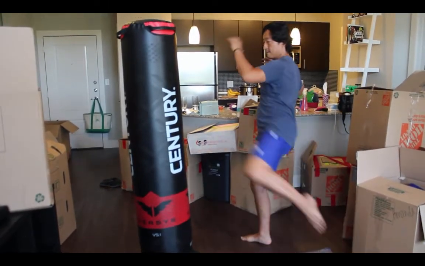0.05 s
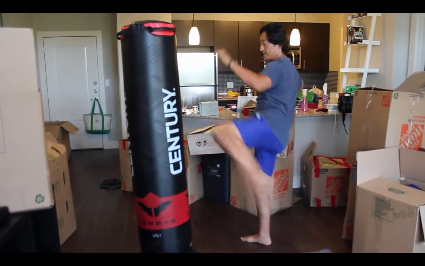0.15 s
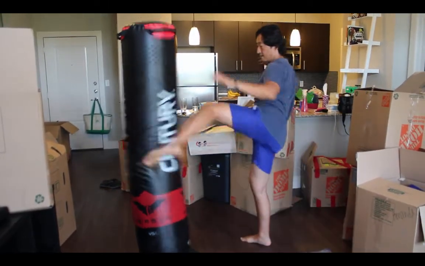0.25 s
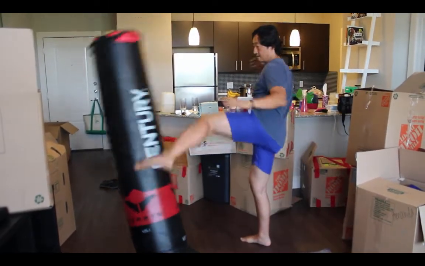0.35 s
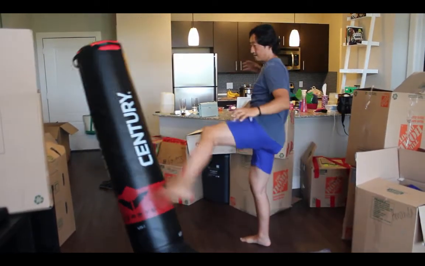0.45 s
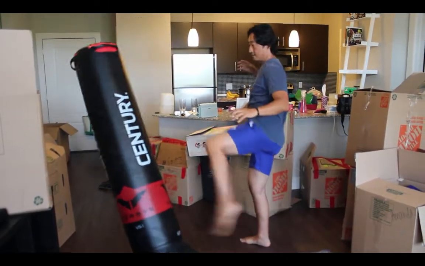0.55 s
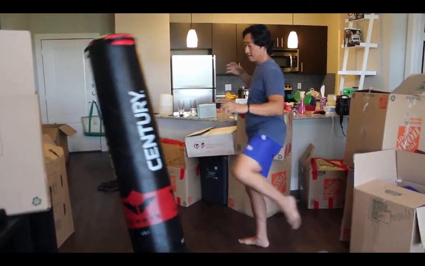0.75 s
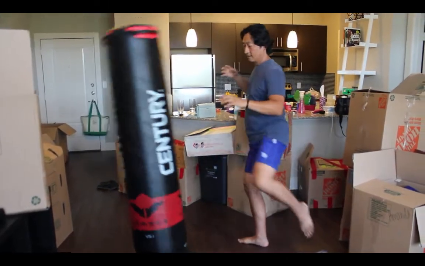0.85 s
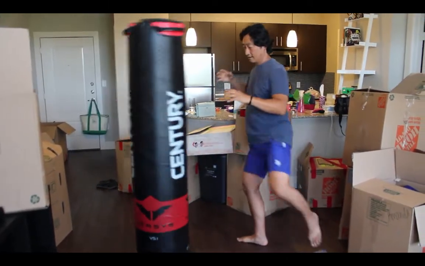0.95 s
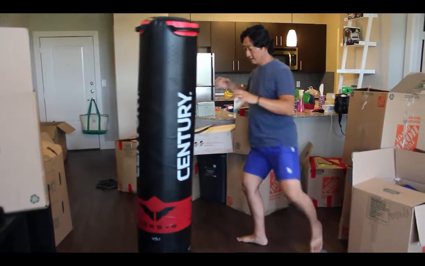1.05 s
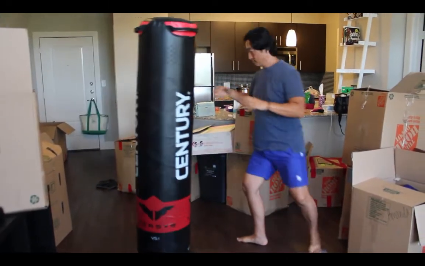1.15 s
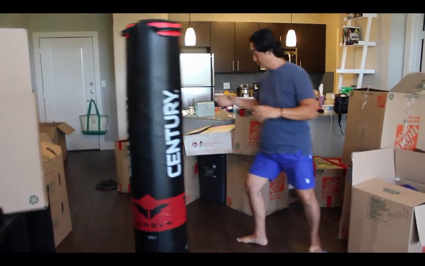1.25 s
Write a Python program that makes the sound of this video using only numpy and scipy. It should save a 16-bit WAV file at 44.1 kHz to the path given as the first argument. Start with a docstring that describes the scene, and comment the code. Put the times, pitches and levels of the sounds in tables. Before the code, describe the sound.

A bare foot smacks a heavy free-standing punching bag once, loud and sharp, in a living room

```python
"""Over steady room noise a standing foot twists on the floor and a rustle swells, then a bare foot smacks
a free-standing punching bag in a living room. The slap is a damped pressure pulse with the ringing modes
and bright crack of the vinyl cover; delayed copies, decaying noise and low modes make the room's answer.
Decaying sines make the base thuds and floor touches; shaped noise makes the scuffs, rustles and twist.
A limiter holds down the slap and the start of its tail, then lets the level recover."""
import sys
import numpy as np
from scipy import signal
from scipy.io import wavfile

SR = 44100
rng = np.random.default_rng(int(sys.argv[2]) if len(sys.argv) > 2 else 0)


def int16_out(signal):
    """Quantize to a 16-bit WAV file."""
    q = np.round(np.clip(np.atleast_2d(signal).T, -1, 1) * 32767)
    wavfile.write(sys.argv[1], SR, q.astype(np.int16))


N = 57330
T = np.arange(N) / SR   # time axis in seconds

# In every spectrum the levels are relative: the noise is scaled to rms 1 before its envelope.
# Modes of the struck cover: pitch_hz, level_db, t60_s
COVER_MODES = [(177, -13, 0.017), (347.6, 1.5, 0.059), (469, -11.5, 0.018), (940, -7, 0.017),
               (1540, 0, 0.014), (2133, 4.5, 0.012), (3020, -24, 0.027)]
# Echoes from floor, ceiling and boxes: delay_s, level_db
ECHOES = [(.00245, -4.5), (.0045, -5.5), (.0072, -14), (.0093, -17.5), (0.0094, -15.5), (0.0138, -16)]
# Spectrum of the scatter from the furniture: frequency_hz, relative_db_per_hz
SCATTER_SPECTRUM = [(60, -24), (110, -36), (170, 15), (350, -21), (700, 3.5), (950, 8), (1200, 1),
                    (1600, -2.5), (3200, -2), (4000, -36), (6000, -12.5), (15500, -12)]
# Spectrum of the room's tail: frequency_hz, relative_db_per_hz
TAIL_SPECTRUM = [(59, -48), (100, -10), (140, -6.5), (209, -8.5), (238, -11), (370, -1), (457, -19),
                 (564, 13), (627, -7), (1160, -7.5), (1260, -12.5), (1590, -6), (2470, -15), (5170, -17.5),
                 (15500, -26.5)]
# Decay time of the room's tail: frequency_hz, t60_s
ROOM_T60 = [(120, 0.6), (350, 0.61), (800, 0.66), (1500, .68), (5000, 0.71), (9000, .53), (15000, 0.57)]
# Low modes of the room: pitch_hz, level_db, t60_s
ROOM_MODES = [(148.7, -13.5, 0.32), (216.3, -16.5, 0.27), (342.6, -27.5, 0.78), (365, -17, 0.36),
              (498.3, -18.5, 0.39), (571.7, -23, 0.64), (626, -31, 0.52), (682.6, -30, 0.36),
              (742, -25.5, 0.58), (871, -35, .62), (1015, -24, 0.42)]
# Thuds of the base: start_s, level_db
THUDS = [(0.252, -23), (0.297, -21.5), (0.317, -30), (.417, -36), (0.493, -38), (0.541, -38.5)]
# Spectrum of the scuffing base: frequency_hz, relative_db_per_hz
SCUFF_SPECTRUM = [(88, -30), (150, -5), (230, -35), (258, -1.5), (381, -8.5), (471, 10), (509, -10),
                  (751, -6), (894, -6.5), (1510, -3), (15500, -30)]
# Course of the scuffing, its end values held outward: time_s, level_db
SCUFF_LEVEL = [(.6, -54.5), (.79, -50), (.85, -44.5), (.93, -42), (1.0, -44.5), (1.1, -44.5), (1.19, -51),
               (1.26, -47.5), (1.3, -48)]
# Spectrum of the standing foot's twist: frequency_hz, relative_db_per_hz
PIVOT_SPECTRUM = [(200, -6), (600, -17), (1100, -0.5), (1650, 0), (2300, -10), (3100, -9.5), (5000, -19),
                  (15000, -58)]
# Rustles of the shorts and the vinyl, with exponential time constants: peak_s, level_db, rise_s, fall_s
RUSTLES = [(0.25, -39, 0.094, .02), (.415, -32.5, 0.02, 0.022), (.89, -50.5, 0.1, 0.11),
           (1.09, -57, 0.011, 0.046)]
# Spectrum of the rustles: frequency_hz, relative_db_per_hz
RUSTLE_SPECTRUM = [(200, 10), (1500, -12), (3000, 0.5), (6000, -4.5), (11000, -1.5), (15500, -0.5)]
# Soft touches of feet and base on the floor: start_s, level_db, pitch_hz
STEPS = [(0.736, -39, 330), (0.926, -47, 316), (1.051, -39, 291), (1.133, -40.5, 139), (1.268, -39, 323),
         (1.275, -39, 170), (1.283, -32, 335)]
# Spectrum of the steady room noise: frequency_hz, relative_db_per_hz
AIR_SPECTRUM = [(15, -39), (25, 3), (110, -13.5), (253, -3.5), (289, -11), (389, -1), (433, -21.5),
                (598, -9), (871, -20), (997, -16), (1620, -16.5), (2170, -28), (3340, -19.5),
                (15500, -33.5)]

KICK_S = 0.2491
# Air squeezed out between foot and cover
PUSH_DB, PUSH_HZ, PUSH_T60_S = 7.5, 350, 0.0054
# The instep lands flat on the vinyl: a bright ring and a burst of hiss
CRACK_LAG_S, CRACK_HZ, CRACK_DB = 0.00049, 5260, 22
CRACK_T60_S, CRACK_RISE_S = 0.002, 0.00044
SNAP_DB, SNAP_T60_S, SNAP_LOW_HZ = 12, 0.002, 8640
ECHO_LOW_HZ = 109   # small surfaces return little bass
SCATTER_DB, SCATTER_T60_S, SCATTER_RISE_S = -0.5, 0.1, 0.0036
TAIL_DB, TAIL_RISE_S = -10, 0.002
NULL_HZ, NULL_Q = 111.8, 1.34   # the room cancels this pitch at the microphone
THUD_HZ, THUD_T60_S, THUD_RISE_S = 50, 0.14, 0.0019
# The standing foot twists on the floor; its sole first breaks loose
PIVOT_S, PIVOT_DB, PIVOT_T60_S, PIVOT_RISE_S = 0.186, -38, 0.36, 0.0018
UNSTICK_DB, UNSTICK_T60_S, UNSTICK_RISE_S = -32, 0.018, 0.002
STEP_T60_S, STEP_RISE_S = 0.09, 0.0023
AIR_DB = -47
MIC_LOW_HZ, CUTOFF_HZ = 45, 15700   # bass roll-off of the microphone, upper band limit
LIMIT_DB, LIMIT_ATTACK_S, RELEASE_DB_PER_S, DETECT_S = -2.5, 0.00045, 53, 0.00062


def from_db(db):
    """Amplitude ratio is ten to the power of the level over twenty."""
    return 10 ** (np.asarray(db) / 20)


def at_hz(points, hz):
    """Pitch is logarithmic, so a table is interpolated on a log-frequency axis."""
    table_hz, values = np.transpose(points)
    return np.interp(np.log(hz), np.log(table_hz), values)


def fade(start, t60, rise=1e-5):
    """Exponential build-up and decay: rise is a time constant, t60 the time of a 60 dB fall."""
    age = np.maximum(T - start, 0)
    return (1 - np.exp(-age / rise)) * np.exp(-np.log(1000) * age / t60)


def ring(start, hz, t60, rise=1e-5):
    """Modal vibration: a struck mode is a sine that dies away exponentially."""
    return fade(start, t60, rise) * np.sin(2 * np.pi * hz * (T - start))


def highpass(sound, order, hz):
    """Butterworth filtering: a maximally flat response above the corner frequency."""
    return signal.sosfilt(signal.butter(order, hz, "high", fs=SR, output="sos"), sound)


def noise(spectrum, envelope=lambda hz: 1):
    """Band synthesis: third-octave noises add in power to rms 1 before each gets its envelope."""
    edges = 22 * 2 ** (np.arange(30) / 3)
    white = rng.standard_normal((2, N + SR // 4))   # the extra quarter second lets the filters settle
    total, power = 0, 0
    for k, (low, high) in enumerate(zip(edges, edges[1:])):
        center_hz = np.sqrt(low * high)
        bandpass = signal.butter(2, [low, high], "band", fs=SR, output="sos")
        band = signal.sosfilt(bandpass, white[k % 2])[-N:]   # neighbours use different noise
        gain = from_db(at_hz(spectrum, center_hz)) * np.sqrt(high - low)
        total = total + gain * band / band.std() * envelope(center_hz)
        power = power + gain ** 2
    return total / np.sqrt(power)


def slap():
    """Impact radiation: expelled air gives a steep pulse, the cover rings in its modes, then cracks."""
    pulse = np.cos(2 * np.pi * PUSH_HZ * (T - KICK_S))   # a cosine starts at full pressure
    push = from_db(PUSH_DB) * fade(KICK_S, PUSH_T60_S) * pulse
    cover = sum(from_db(db) * ring(KICK_S, hz, t60) for hz, db, t60 in COVER_MODES)
    crack_s = KICK_S + CRACK_LAG_S
    crack = from_db(CRACK_DB) * ring(crack_s, CRACK_HZ, CRACK_T60_S, CRACK_RISE_S)
    hiss = highpass(rng.standard_normal(N), 4, SNAP_LOW_HZ)
    snap = from_db(SNAP_DB) * hiss * fade(crack_s, SNAP_T60_S)
    return push + cover + crack + snap


def room(hit):
    """Reverberation: distinct echoes, a dense scatter, then a frequency-dependent tail and low modes."""
    thin = highpass(hit, 1, ECHO_LOW_HZ)
    echoes = sum(from_db(db) * np.interp(T - delay, T, thin) for delay, db in ECHOES)
    scatter_fade = fade(KICK_S, SCATTER_T60_S, SCATTER_RISE_S)
    scatter = from_db(SCATTER_DB) * noise(SCATTER_SPECTRUM) * scatter_fade
    tail_noise = noise(TAIL_SPECTRUM, lambda hz: fade(KICK_S, at_hz(ROOM_T60, hz), TAIL_RISE_S))
    tail = from_db(TAIL_DB) * tail_noise
    modes = sum(from_db(db) * ring(KICK_S, hz, t60, TAIL_RISE_S) for hz, db, t60 in ROOM_MODES)
    return echoes + scatter + tail + modes


def bag_base():
    """Impact and friction: the heavy base thuds in a low mode as the bag tips, and scuffs as it rocks back."""
    thuds = sum(from_db(db) * ring(start, THUD_HZ, THUD_T60_S, THUD_RISE_S) for start, db in THUDS)
    scuff_db = np.interp(T, *np.transpose(SCUFF_LEVEL))
    return thuds + from_db(scuff_db) * noise(SCUFF_SPECTRUM)


def pivot():
    """Friction: the sole breaks loose in a short burst of noise, then slides with a longer decay."""
    slide = from_db(PIVOT_DB) * fade(PIVOT_S, PIVOT_T60_S, PIVOT_RISE_S)
    unstick = from_db(UNSTICK_DB) * fade(PIVOT_S, UNSTICK_T60_S, UNSTICK_RISE_S)
    return (slide + unstick) * noise(PIVOT_SPECTRUM)


def rustles():
    """Rubbing surfaces: noise swells and falls exponentially as the leg swings out and back."""
    swells = 0
    for peak, db, rise, fall in RUSTLES:
        distance = np.maximum((peak - T) / rise, (T - peak) / fall)
        swells = swells + from_db(db) * np.exp(-distance)
    return swells * noise(RUSTLE_SPECTRUM)


def floor_touches():
    """Soft impact: each touch of foot or base excites one damped mode with a gradual onset."""
    return sum(from_db(db) * ring(start, hz, STEP_T60_S, STEP_RISE_S) for start, db, hz in STEPS)


def room_air():
    """Stationary noise: the room's background keeps a fixed spectrum and level."""
    return from_db(AIR_DB) * noise(AIR_SPECTRUM)


def scene():
    """Superposition: the kick with its room, notched by interference, adds to the other sources."""
    hit = slap()
    null = signal.iirnotch(NULL_HZ, NULL_Q, fs=SR)
    kick = signal.lfilter(*null, hit + room(hit))
    return (kick + bag_base() + pivot() + rustles() + floor_touches() + room_air())[None]


def smooth(values, time_s):
    """First-order lag: the output approaches its input with the given time constant."""
    keep = np.exp(-1 / (time_s * SR))
    return signal.lfilter([1 - keep], [1, -keep], values)


def record(dry):
    """Dynamic range control: bass roll-off, limiting with slow release, clipping, then a treble cut."""
    mic = highpass(dry, 2, MIC_LOW_HZ)
    level_db = 10 * np.log10(smooth(mic[0] ** 2, DETECT_S) + 1e-12)
    over_db = np.maximum(level_db - LIMIT_DB, 0)
    # hold each peak of the reduction, then release it at a constant number of decibels per second
    release_db = RELEASE_DB_PER_S * T
    held_db = np.maximum.accumulate(over_db + release_db) - release_db
    limited = mic * from_db(-smooth(held_db, LIMIT_ATTACK_S))
    clipped = np.clip(limited, -1, 1)   # peaks that pass before the gain has fallen
    treble_cut = signal.ellip(10, 0.1, 70, CUTOFF_HZ, fs=SR, output="sos")
    return signal.sosfilt(treble_cut, clipped)


dry = scene()
out = record(dry)
int16_out(out)
```